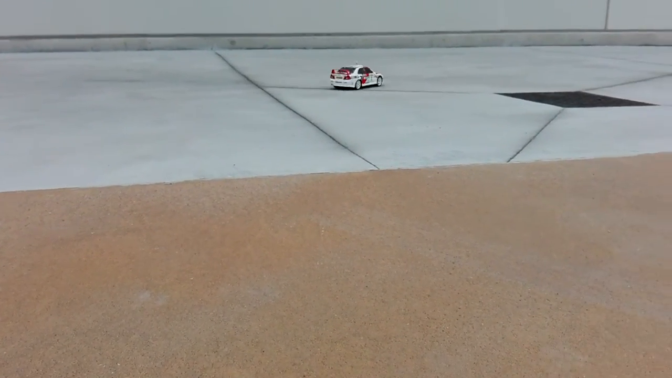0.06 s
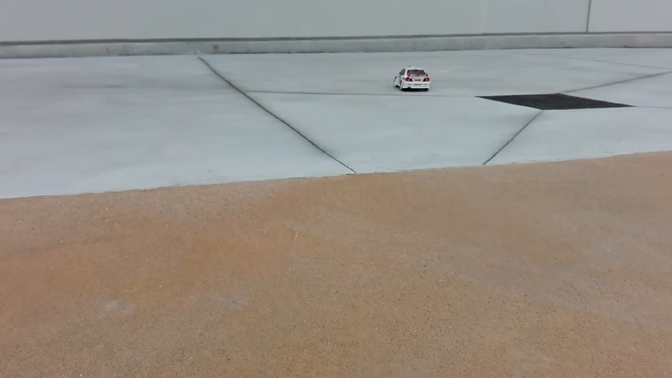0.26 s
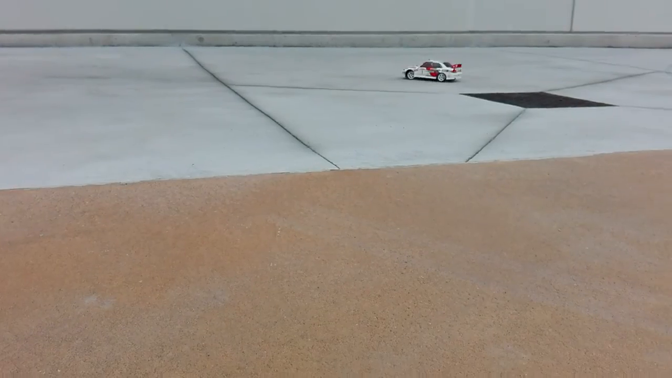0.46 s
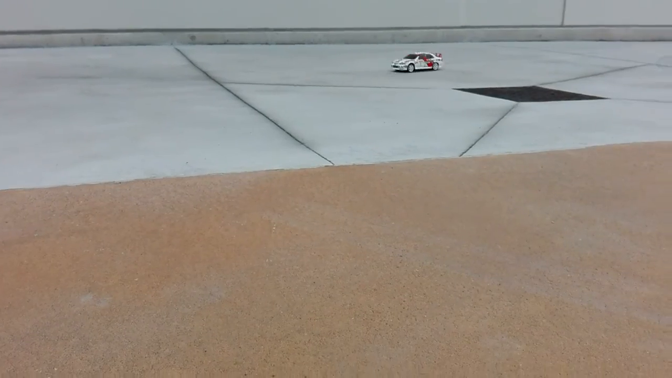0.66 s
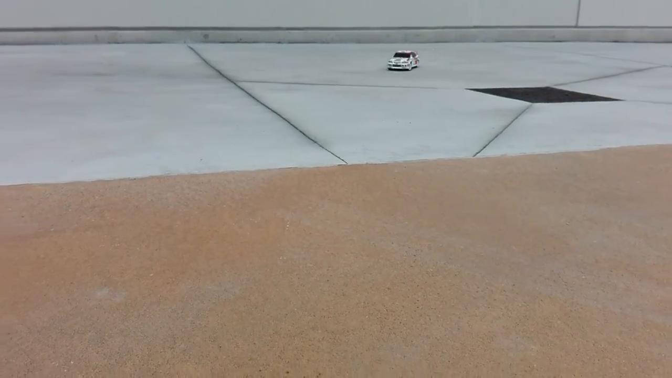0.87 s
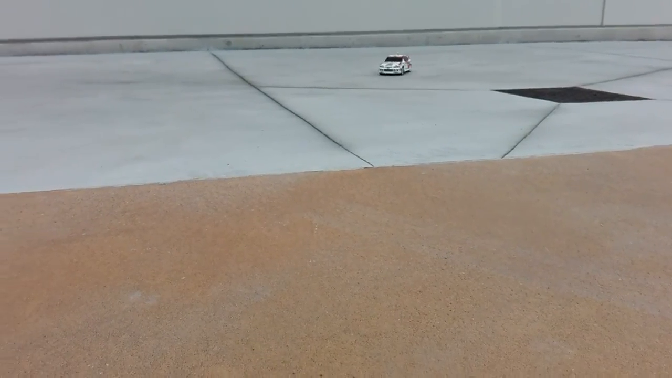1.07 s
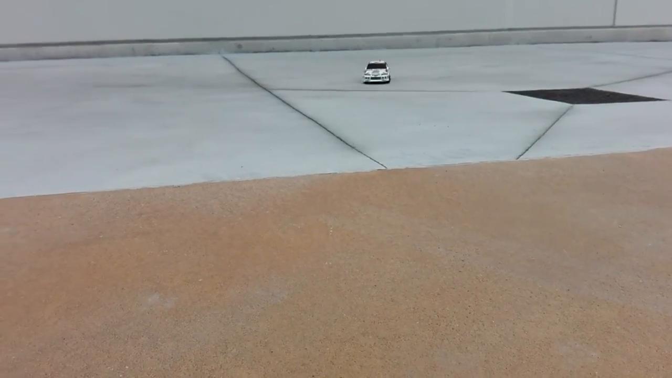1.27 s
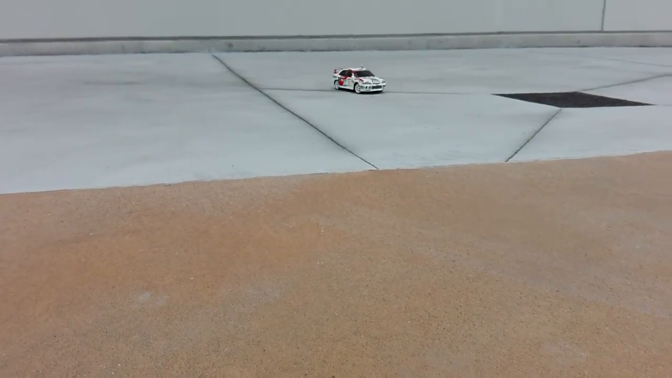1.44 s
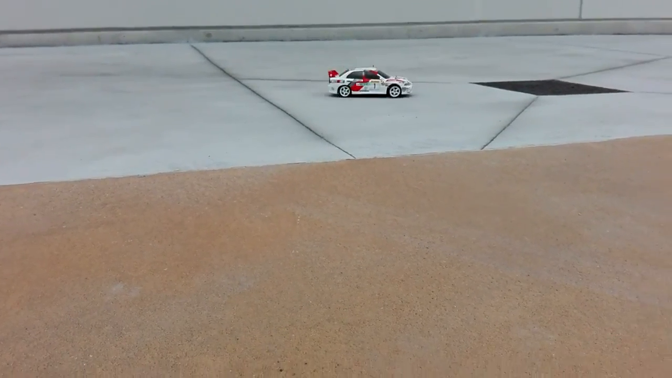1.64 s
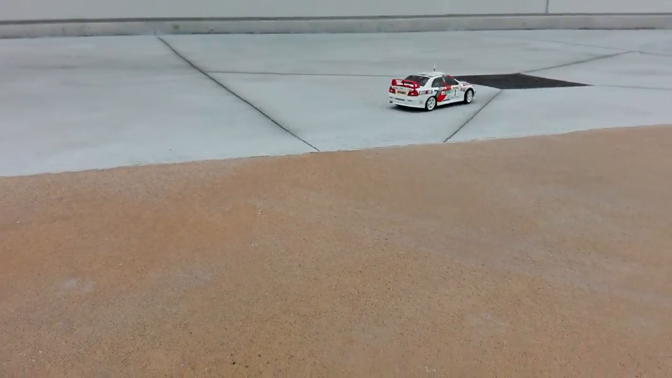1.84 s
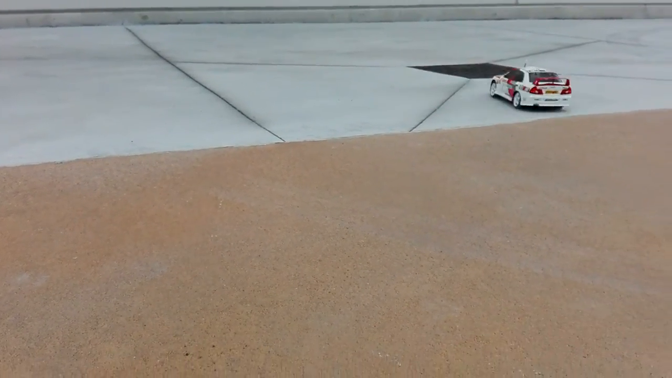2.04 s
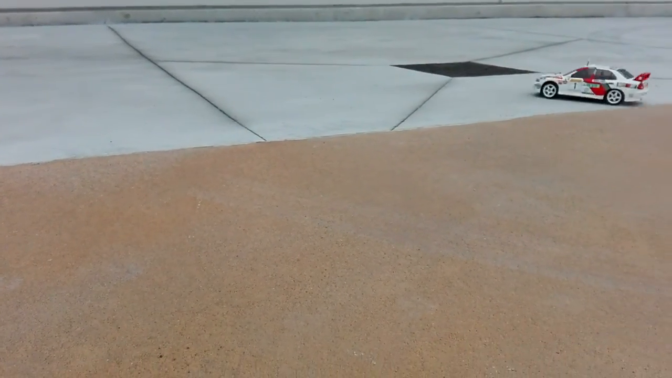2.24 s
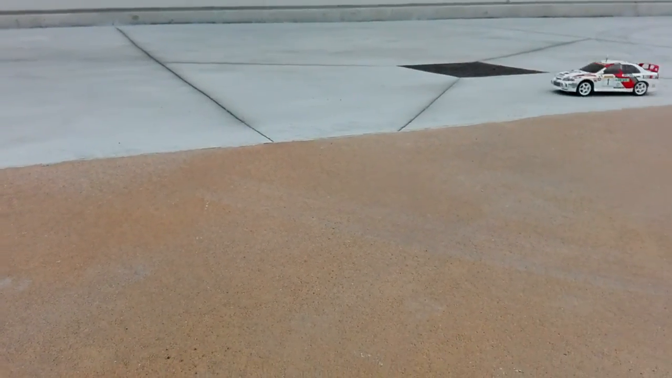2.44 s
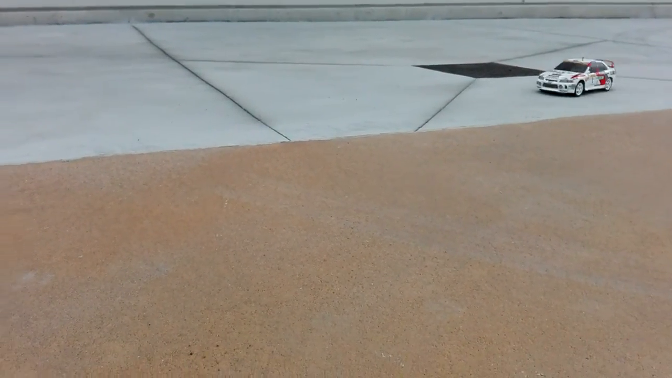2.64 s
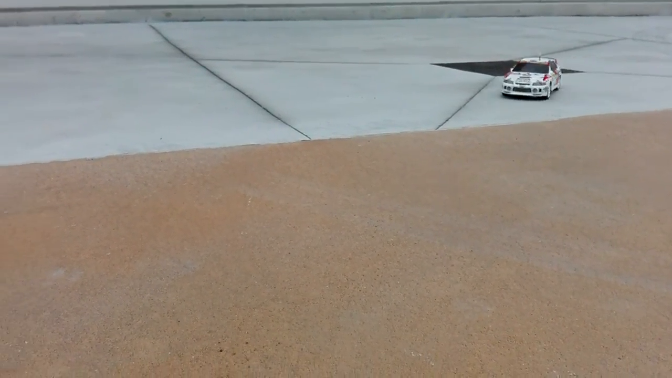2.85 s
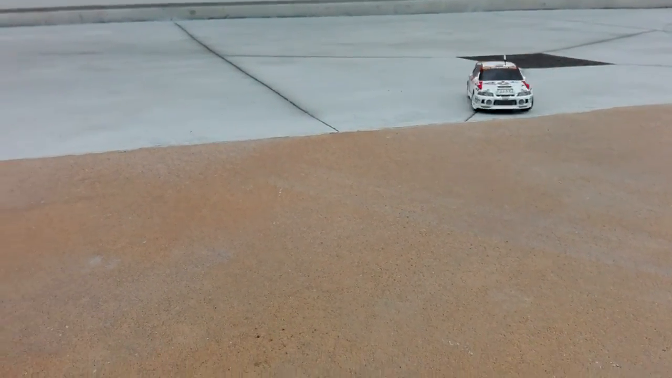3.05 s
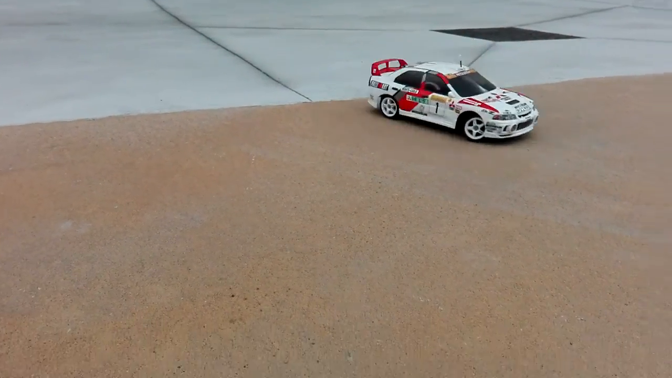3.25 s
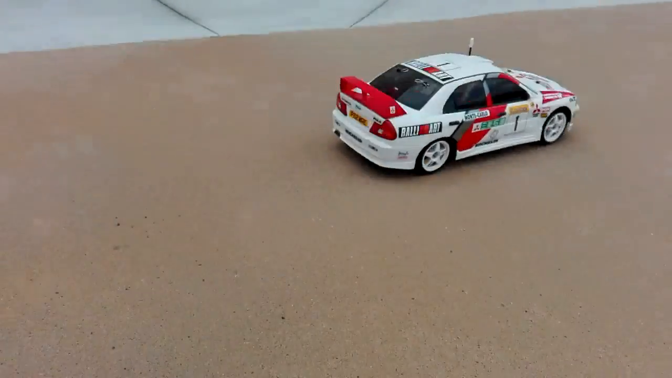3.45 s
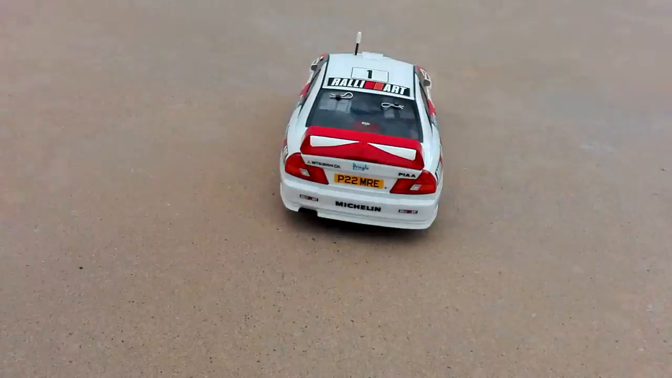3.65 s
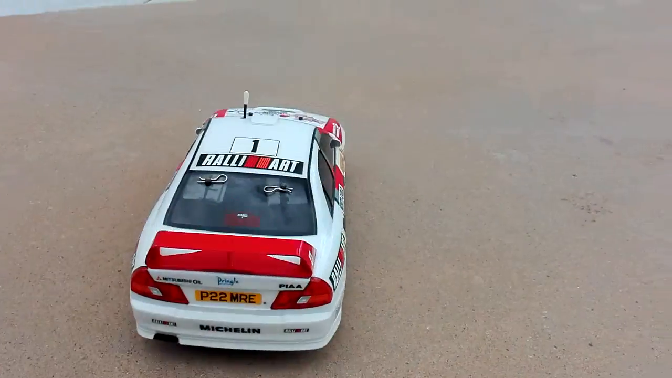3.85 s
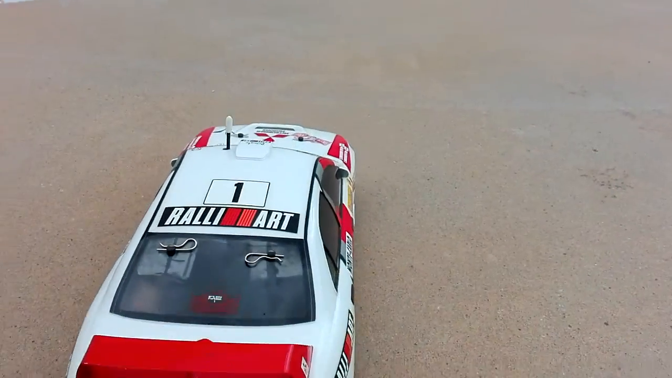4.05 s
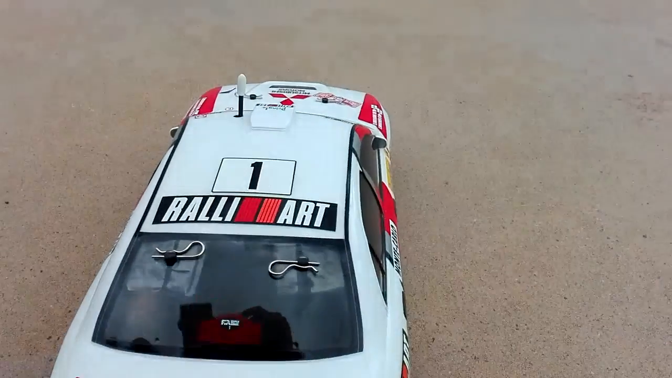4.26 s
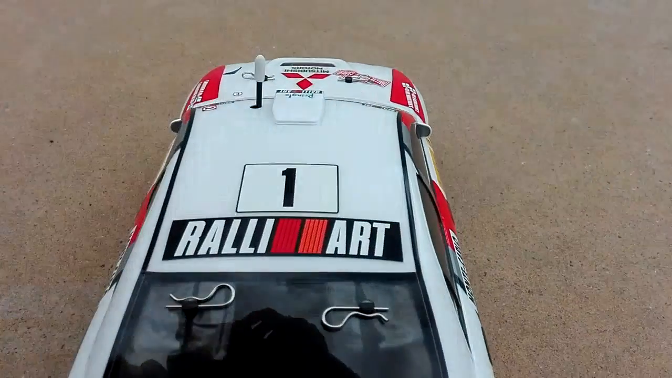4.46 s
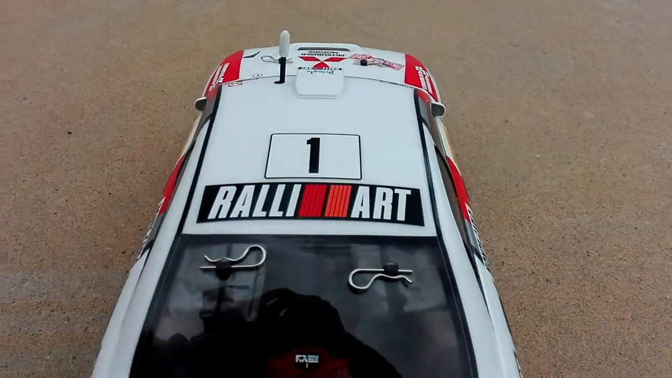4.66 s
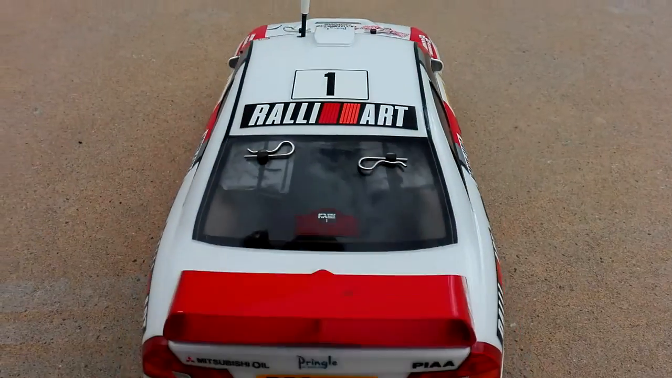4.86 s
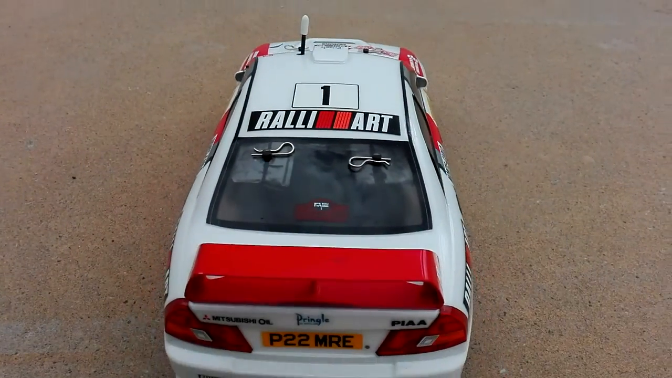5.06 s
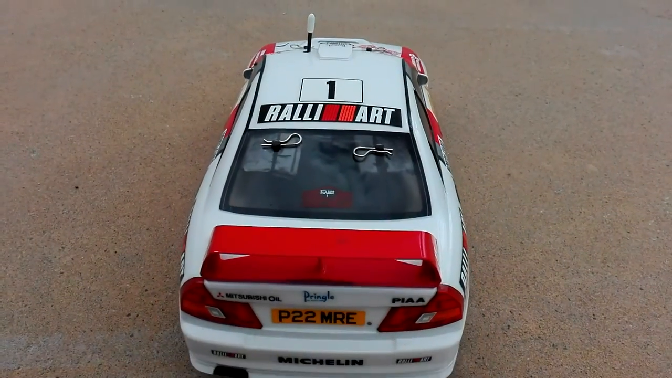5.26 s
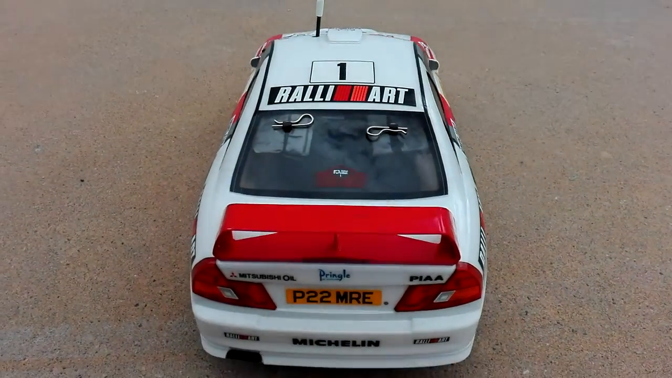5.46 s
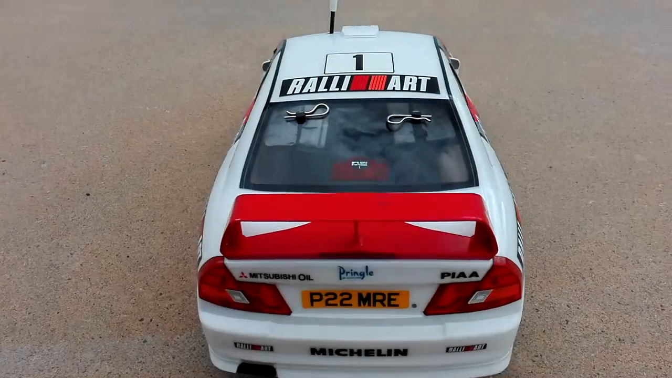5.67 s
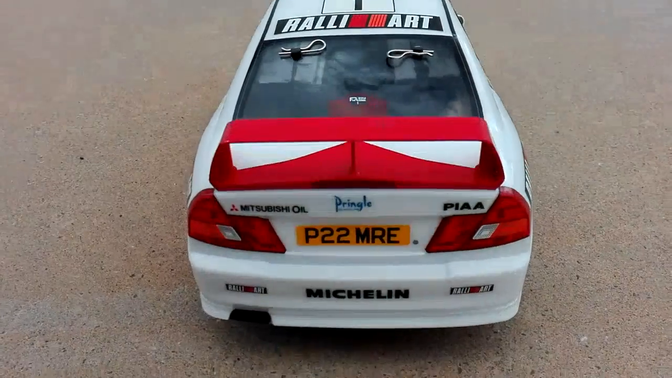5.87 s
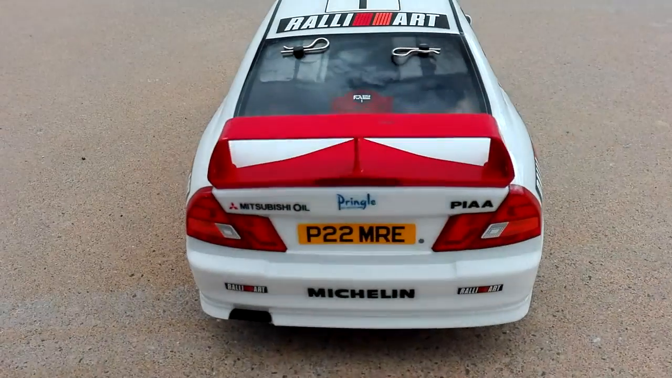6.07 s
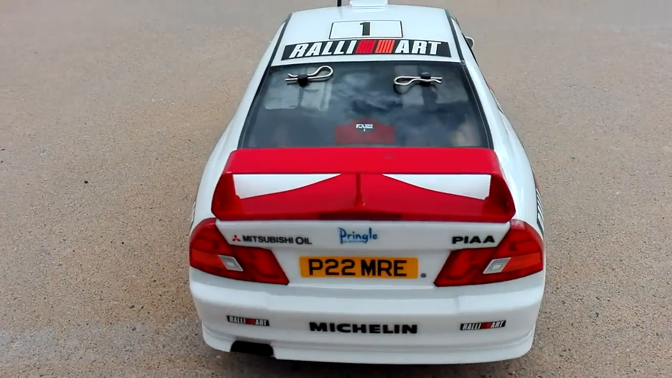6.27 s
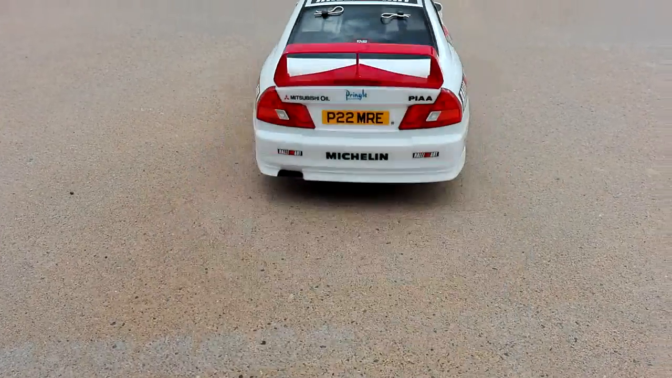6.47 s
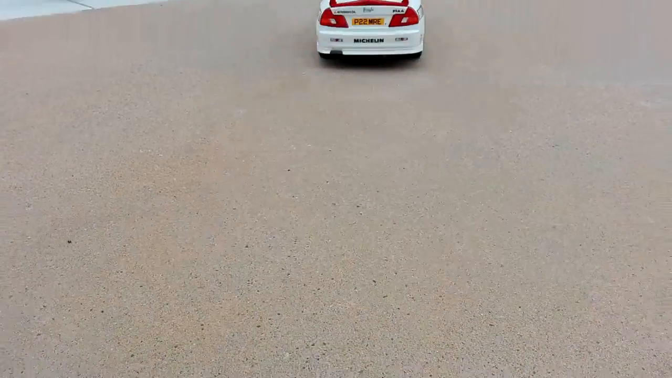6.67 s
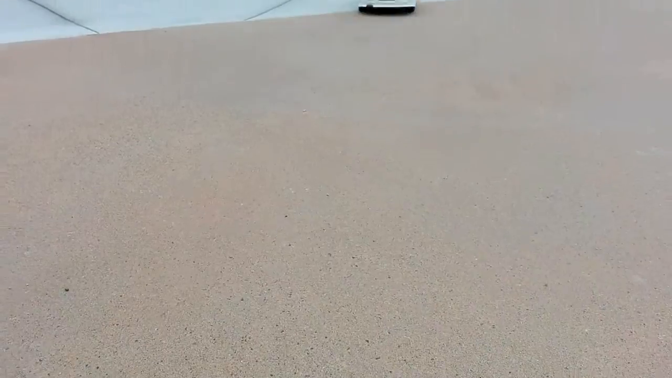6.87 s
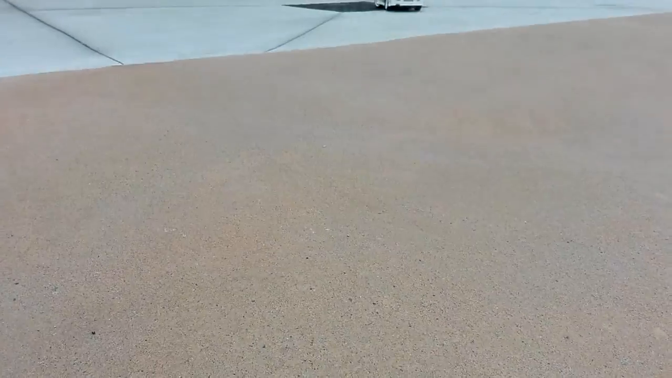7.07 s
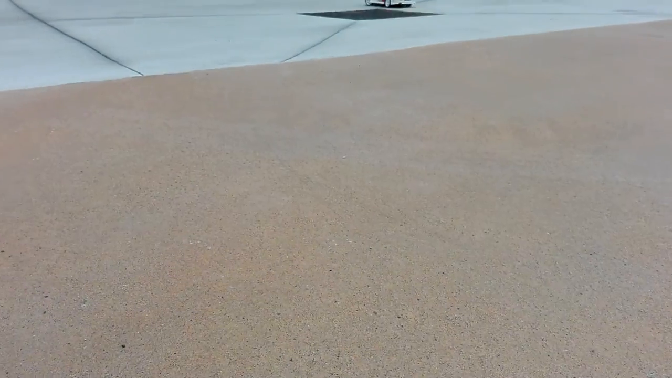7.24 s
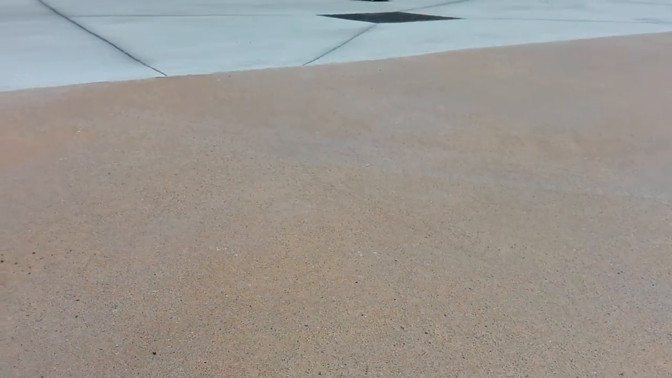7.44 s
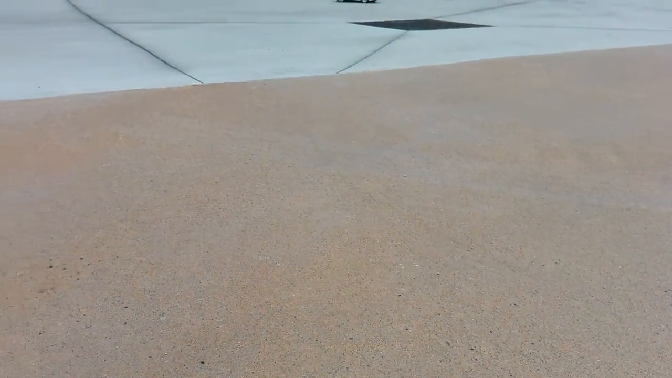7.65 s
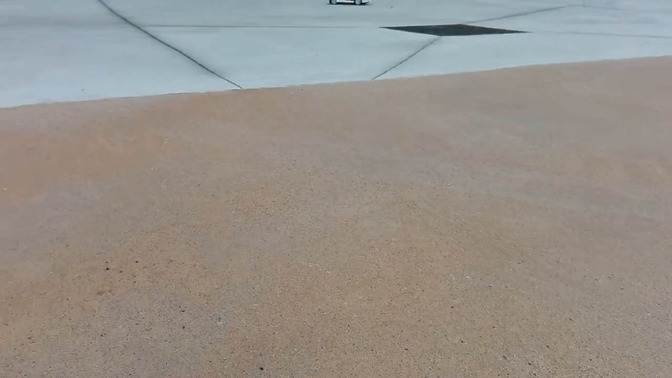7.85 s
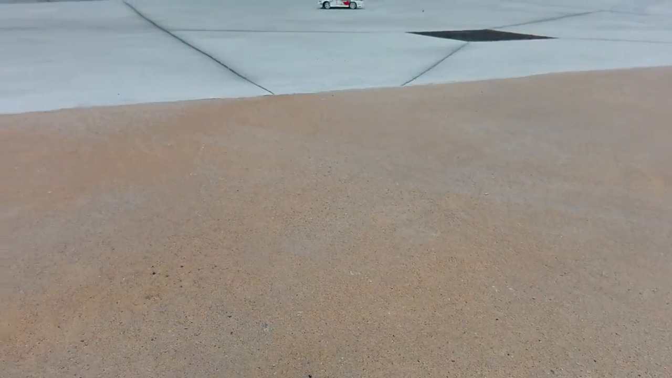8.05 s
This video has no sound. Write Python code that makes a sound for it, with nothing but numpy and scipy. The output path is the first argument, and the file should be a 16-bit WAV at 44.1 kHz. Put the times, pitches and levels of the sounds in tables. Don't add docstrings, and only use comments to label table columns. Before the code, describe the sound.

Motor hum, gear whir and tyre grit rise as a toy car nears and halts; small servo twitches follow, then it speeds off.

```python
import sys
import numpy as np
from scipy import signal
from scipy.fft import rfft, irfft, next_fast_len
from scipy.io import wavfile
from scipy.ndimage import uniform_filter1d

SR = 44100
rng = np.random.default_rng(int(sys.argv[2]) if len(sys.argv) > 2 else 0)


def volts(x):
    e = np.asarray(x, float) / 20
    return 10 ** e


def bounce(signal):
    frames = np.transpose(np.atleast_2d(signal))
    limited = np.clip(frames, -1, 1)
    pcm = np.round(limited * 32767).astype(np.int16)
    wavfile.write(sys.argv[1], SR, pcm)


N = 357651
T = np.arange(N) / SR

# f/Hz, density/dB
WIND_SPECTRUM = [(8.8, -46), (15, 12), (37, 1.5), (67, 3), (117, -5), (162, -18), (252, -24.5), (300, -34),
                 (390, -53), (660, -120)]
# peak t/s, level/dB, hold/s
GUSTS = [(0.08, -43, 0.018), (0.276, -48.5, 0.23), (1.618, -36.5, 0.029), (1.85, -53, 0.37),
         (2.514, -45.5, 0.015), (3.59, -49, 0.31), (4.35, -50.5, 0.019), (4.724, -45, 0.03),
         (5.12, -49.5, 0.046), (6.856, -43.5, .17), (7.26, -37.5, .02), (7.438, -41.5, 0.16),
         (7.782, -37, 0.017), (7.92, -34.5, 0.25)]
BREEZE_DB, GUST_RISE_DB_S, GUST_FALL_DB_S, LUMPS_DB = -56, 142, 248, 3
# f/Hz, density/dB
YARD_SPECTRUM = [(88, -24), (150, 8.5), (246, 1.5), (603, -12), (1090, 0.5), (1630, -7), (2520, -36),
                 (6930, -20), (7620, -17), (8070, -28), (8550, -22.5), (14300, -27)]
YARD_DB = -65
# t/s, level/dB
SCUFF = [
    (3.7, -53.5),
    (4.44, -55),
    (4.57, -55.5),
    (5.29, -61),
    (6.16, -66),
    (6.4, -60),
]
# f/Hz, density/dB
SCUFF_SPECTRUM = [(180, -39), (300, -26), (414, 2.5), (456, -11.5), (762, -7), (1730, -0.5), (2280, -8),
                  (3690, -12.5), (14000, -38)]
# t/s, peak level/dB, f/Hz, t60/s
THUMPS = [
    (0.308, -28, 226, 0.062),
    (1.151, -27, 234, 0.054),
    (2.994, -26.5, 234, 0.052),
    (3.423, -41.5, 256.5, 0.42),
    (4.287, -40.5, 223, 0.1),
    (4.604, -38, 413, 0.27),
    (4.669, -26, 411, 0.11),
    (6.993, -22, 248, 0.041),
    (7.923, -30, 191, 0.098),
]
# t/s, peak level/dB, low ring re crack/dB, t60/s
KNOCKS = [(0.614, -25, -12, 0.041), (1.5657, -24.5, -15, 0.03), (3.7165, -43, 16.5, 0.044),
          (4.6184, -28, -10, 0.034), (4.5916, -47, 5, 0.03), (4.6508, -23, 7.5, 0.076),
          (4.668, -19.5, 12.5, 0.07), (4.6785, -37, -15, 0.03), (6.508, -25.5, -23, 0.014),
          (6.989, -23, 5.5, 0.016), (7.2207, -23, -11, 0.028), (7.2281, -8, -17, 0.025),
          (6.527, -30, -20, 0.013), (7.2547, -20.5, -15, 0.02), (7.2945, -31.5, 7, 0.05),
          (7.299, -25, 0, 0.05)]
# f/Hz, level/dB, t60/s
KNOCK_MODES = [(1515, 5.5, 0.026), (2000, -8, 0.019), (4420, -6, 0.03), (5270, 1, 0.027),
               (6820, -1.5, 0.019), (7950, 5, 0.01), (9500, -4, 0.013)]
# t/s, peak level/dB, centre f/Hz, brightness/dB
TICKS = [(3.7544, -56, 3320, -12), (3.8716, -46, 5700, -5), (3.8814, -53, 3380, -10),
         (3.9225, -49, 3290, -14), (3.954, -38, 4800, -15), (3.965, -45, 5400, -12),
         (4.0587, -46, 4460, -12), (4.148, -50, 3630, -17), (4.17, -44.5, 5100, -5),
         (4.2083, -62, 3330, -2), (4.242, -52, 5260, 1), (4.5734, -52, 4000, -14), (4.8452, -43, 1900, -40),
         (4.897, -52, 5000, -14), (4.964, -44.5, 2930, -16), (5.035, -45.5, 3650, -15),
         (5.113, -45, 5200, -15), (5.1458, -43, 3460, -18), (5.2101, -49, 4060, -15),
         (5.3158, -54, 3370, -10), (5.43, -51, 3350, -12), (5.4443, -45.5, 3330, -5),
         (5.469, -50, 3350, -10), (5.884, -46, 6000, -11), (5.9157, -45, 6000, -12), (6.134, -49, 5630, -5),
         (6.236, -55, 5290, -34), (6.293, -55, 5000, -14), (6.157, -61, 5500, -20),
         (6.3346, -51, 2700, -20), (6.363, -49, 2500, -20), (6.374, -57, 5200, -14),
         (6.387, -41, 2500, -16), (6.414, -36, 2600, -16), (6.445, -44, 4500, -16), (6.574, -40, 5500, -16),
         (6.598, -37, 5200, -16), (6.622, -38, 5000, -16)]
# peak t/s, hold/s, level/dB, rise/(dB/s), fall/(dB/s)
NUDGES = [
    (3.745, .01, -80, 900, 24),
    (4.397, .02, -67, 400, 170),
    (4.536, 0.024, -54, 300, 300),
    (4.634, 0.15, -58, 300, 1107),
    (5.524, 0.021, -66.5, 125, 125),
    (5.635, .01, -59.5, 220, 180),
    (5.79, .03, -57.5, 101.5, 70),
    (6.1, 0.1, -98, 100, 298),
    (6.4, 0.093, -56, 107, 20),
]
WHINE_HZ = 7800
SPLIT_FROM_S, SPLIT_OVER_S = 6.25, 0.093
# peak t/s, level/dB, f/Hz, glide/(Hz/s), half length/s
CHIRPS = [
    (3.769, -63, 1415, -2500, 0.089),
    (4.051, -69, 4520, -800, 0.088),
    (4.228, -62, 1935, -800, .13),
    (5.048, -60.5, 3730, -600, .07),
    (5.599, -75.5, 3790, 202, 0.052),
    (5.97, -75, 3810, 400, 0.059),
    (5.467, -73, 3600, -2, 0.04),
]
CHIRP_EDGE_DB = 17
# start t/s, hold/s, rasp level/dB, tooth rate f/Hz, body jolt re rasp/dB
STROKES = [
    (4.406, 0.099, -38.5, 2723, -43),
    (4.626, 0.0099, -49, 2514, 1.5),
    (4.652, 0.024, -33, 2690, -5.5),
    (4.713, 0.011, -38.5, 2720, -33),
]
STROKE_RISE_DB_S, STROKE_FALL_DB_S, SAG_HZ_PER_S, LOW_DB = 590.5, 656, -3000, 1
# start t/s, hold/s, level/dB, low part re level/dB
SETTLE = [
    (4.384, 0.037, -48.5, -15),
    (4.482, 0.028, -53, -8),
    (4.68, 0.043, -50.5, 5),
    (4.813, 0.037, -52.5, -24),
    (4.904, 0.03, -59, -17),
    (3.73, 0.041, -68, -18),
]
SETTLE_RISE_DB_S, SETTLE_FALL_DB_S, CREAK_FLUTTER_DB = 500, 165, 2.6
# f/Hz, density/dB
RASP_SPECTRUM = [(88, -52), (150, -27), (412, -29), (462, -32.5), (1180, -37), (1510, -21), (1930, -28.5),
                 (2720, -8), (4060, -16), (5210, -7.5), (14300, -24.5)]
# f/Hz, width/Hz, level/dB
RASP_MODES = [(1470, 72, 1), (1780, 120, 10), (5100, 290, -1), (6700, 370, 3.5), (9600, 670, -2)]
# f/Hz, density/dB
SHELL_SPECTRUM = [(88, -46), (150, -11), (189, -22.5), (251, -15.5), (361, -15), (489, -14.5), (615, -14),
                  (884, -11.5), (1070, -7.5), (2750, -7.5), (3420, -3), (5950, -8), (7920, -3), (9580, -10),
                  (14300, -18)]
# f/Hz, width/Hz, level/dB
SHELL_MODES = [(889, 142, 11.5), (1089, 120, 3), (1488, 50, -1), (1650, 32, -6), (3600, 1300, -3.5),
               (5150, 350, -4.5), (6500, 130, -18)]
# t/s, level/dB, heading (open underside toward the listener)/dB
PASS = [
    [(0, -36, -6), (.3, -41, 0.5), (.9, -43, -2), (1.25, -47, 0), (1.5, -42.5, -2.5), (1.63, -37, -1),
     (1.97, -35.5, 1), (2.3, -37, 0), (2.9, -39.5, 1), (3.18, -36, 0), (3.36, -29, -1.5), (3.52, -35, -2),
     (3.64, -47.5, 8), (3.72, -50.5, 2.5), (3.76, -77, -37)],
    [(6.32, -86, -8), (6.464, -40, -15.5), (6.69, -35, -1), (6.94, -34, 2), (7.19, -40.5, -3.5),
     (7.25, -38.5, -2), (7.36, -43.5, -3.5), (7.68, -50.5, 0.5), (8.11, -58, -16)],
]
ROUGH_FROM_S, ROUGH_OVER_S, ROUGH_DB = 2.56, 0.98, 10.5
HISS_DB, FIZZ_DB, RUMBLE_DB, HISS_TURN, FIZZ_TURN = -4.5, -8.5, -28, 0.15, 1.33
HISS_FAR_DB_PER_DB = 0.23
SCRAPE_DB, SCRAPE_ROUGH, STREAK_DB = -27, 0.82, 2.4
# t/s, hum f/Hz, load/dB, tooth bite/dB
SPEED = [
    [(0, 451, -19, 5), (.16, 492.5, 7, 3.5), (.43, 477, 0, -4), (.485, 406, 3, 8), (.9, 390.4, 0, 7),
     (1.0, 431, 2, 0.5), (1.38, 417, 1, 6), (1.63, 535, 4.5, 1), (1.75, 494, 0, 4.5), (1.88, 502.5, 3.5, 3),
     (2.02, 428, 1, -11), (2.2, 471, 3.5, 5), (2.75, 443, -3, 0.5), (3.05, 503, 3, -1),
     (3.37, 541.4, -4.5, -3), (3.5, 520, -12, -5), (3.75, 296, -7, -26)],
    [(6.4, 108, 2, -4), (6.56, 164, 2.5, 1), (6.63, 197, 3, 5.5), (6.69, 244, -3, 4.5), (6.76, 328, 0, 5.5),
     (6.82, 408, 2, 11.5), (6.865, 472, 2, 7), (6.93, 490, 1, 3.5), (6.99, 587, 2, 6.5),
     (7.035, 812, 9.5, 1), (7.055, 777, 5, -7), (7.11, 500, -2, -17), (7.17, 416.5, -6.5, -1),
     (8.11, 407, -10, 3)],
]
MESH_RATIO = 8.605
HUM_DB, SECOND_DB, FOURTH_DB, MESH_DB, DOUBLE_DB, HUM_ROUGH = -7, 3.5, -12.5, -8, -12, 0.42
CHATTER_DB, DRIFT_DB = 3.6, 1
TOOTH_SHIVER, STRAIN_S = .011, .4
# f/Hz, level/dB
GEARBOX = [(1600, -5), (2500, -0.5), (3450, 0), (4500, -5.5), (5800, 2), (8200, 11), (10200, -28)]
# f/Hz, level/dB
GEARBOX_DOUBLE = [(2400, -10), (3450, 10), (4300, -10), (6200, -10), (7300, 1), (8300, 1), (10200, -28)]
# f/Hz, level/dB
FLAT = [(1, 0), (2, 0)]
# f/Hz, side re mid where the channels differ/dB
SIDE_LEVEL = [(500, -33), (4000, -16), (14000, 3.5)]
# f/Hz, share of moments when the channels differ [0..1]
SIDE_SHARE = [(150, 0), (350, .5), (550, .2), (800, 0), (4000, 0), (4800, .25), (5800, .5), (8000, .55),
              (9500, .7), (14000, .65)]


def evened(x):
    return x / np.sqrt(np.mean(x ** 2) + 1e-20)


def read(points, hz):
    f, value = np.transpose(points)
    return np.interp(np.log(hz + 1), np.log(f + 1), value)


def columns(rows):
    s, *values = np.transpose(rows)
    since_start = T - s[0] + (s[0] < .01)
    until_end = s[-1] - T + (s[-1] > 8)
    gate = np.clip(np.minimum(since_start, until_end) / .02, 0, 1)
    return gate, *(np.interp(T, s, v) for v in values)


def drives(tables):
    curves = [np.array(columns(table)) for table in tables]
    return sum(c * (c[0] > 0) for c in curves)


def swell(s, hold, db, rise, fall):
    level = db - rise * np.maximum(s - T, 0) - fall * np.maximum(T - s - hold, 0)
    return volts(np.maximum(level, -140))


def rough_ground():
    return ROUGH_DB * np.clip((T - ROUGH_FROM_S) / ROUGH_OVER_S, 0, 1)


def colour(x, points, low_hz=0, high_hz=SR):
    size = next_fast_len(len(x))
    hz = np.fft.rfftfreq(size, 1 / SR) + 1e-3
    edges = 1 / np.sqrt((1 + (low_hz / hz) ** 16) * (1 + (hz / high_hz) ** 16))
    return evened(irfft(rfft(x, size) * volts(read(points, hz)) * edges, size)[:len(x)])


def ringing(x, modes, ring_db):
    size = next_fast_len(len(x))
    hz = np.fft.rfftfreq(size, 1 / SR)
    peaks = sum(volts(db + ring_db) / (1 + (2 * (hz - f) / width) ** 2) for f, width, db in modes)
    return irfft(rfft(x, size) * (1 + peaks), size)[:len(x)]


def resonate(x, hz, width):
    turn = np.exp(2j * np.pi * np.cumsum(hz * np.ones(len(x))) / SR)
    r = np.exp(-np.pi * width / SR)
    return 2 * (turn * signal.lfilter([(1 - r) ** 2], [1, -2 * r, r * r], x / turn)).real


def wander(size):
    return evened(uniform_filter1d(uniform_filter1d(rng.standard_normal(N), size), size))


def rough_line(hz, blur_hz, flutter_db, size):
    turns = np.cumsum(np.minimum(hz, 15000) + blur_hz * wander(size)) / SR
    return np.sqrt(2) * np.sin(2 * np.pi * turns) * volts(flutter_db * wander(4 * size))


def fuzzy_line(hz, width):
    return evened(resonate(rng.standard_normal(N), np.minimum(hz, 15000), width))


def grit(patchy_db, flicker_db, per_s, spread_db, grain_db, streak_db=0):
    a, b, patches, streaks = rng.standard_normal((N // 256 + 5, 513, 4)).T
    patches = evened(uniform_filter1d(uniform_filter1d(patches, size=10, axis=0), size=8, axis=1))
    streaks = evened(uniform_filter1d(uniform_filter1d(streaks, size=2, axis=0), size=60, axis=1))
    field = (a + 1j * b) * volts(patchy_db * patches + streak_db * streaks)
    wash = evened(signal.istft(field, nperseg=1024, noverlap=768)[1][:N])
    stones = volts(spread_db * np.minimum(rng.exponential(1, N), 5)) * (rng.random(N) < per_s / SR)
    stones = signal.lfilter([1], [1, -.97], stones) * rng.standard_normal(N)
    return evened(wash * volts(flicker_db * wander(500)) + volts(grain_db) * evened(stones))


def add(mix, s, sound):
    part = mix[round(s * SR):][:len(sound)]
    part += sound[:len(part)]


def air():
    gusts = sum(swell(s, hold, db, GUST_RISE_DB_S, GUST_FALL_DB_S) for s, db, hold in GUSTS)
    wind = colour(rng.standard_normal(N), WIND_SPECTRUM, 0, 260)
    wind = wind * (volts(BREEZE_DB) + gusts) * volts(LUMPS_DB * wander(1500))
    gate, db = columns(SCUFF)
    scuff = gate * volts(db - 4.5) * colour(grit(1.5, 1.0, 300, 3.0, -12), SCUFF_SPECTRUM)
    yard = volts(YARD_DB - 2) * colour(rng.standard_normal(N), YARD_SPECTRUM)
    return wind + scuff + yard


def thumps():
    out, t = np.zeros(N), np.arange(6000) / SR
    for s, db, hz, t60 in THUMPS:
        ring = volts(-60 * t / t60) * np.sin(2 * np.pi * hz * t) * (1 - np.exp(-t / 0.0038))
        slap = evened(resonate(rng.standard_normal(len(t)), 600, 420)) * volts(-16 - 60 * t / 0.055)
        add(out, s, volts(db - 4) * (ring + slap))
    return out


def knocks():
    out, t = np.zeros(N), np.arange(6000) / SR
    for s, db, low_db, t60 in KNOCKS:
        noise = rng.standard_normal(len(t))
        crack = evened(resonate(noise, 2900, 7400)) * volts(-60 * t / t60)
        modes = 0
        for k, (f, mode_db, mode_t60) in enumerate(KNOCK_MODES):
            decay = volts(mode_db - 60 * t / mode_t60 + low_db * (f < 2500))
            detuned_hz = f * (1 + 0.036 * noise[k])
            modes = modes + decay * np.sin(2 * np.pi * detuned_hz * t + 9 * noise[-k])
        add(out, s, volts(db - 10) * (crack + volts(-1) * modes) * (1 - np.exp(-t / 0.00055)))
    return out


def ticks():
    out, t = np.zeros(N), np.arange(6000) / SR
    envelope = volts(-60 * t / 0.071) + 2.4 * np.exp(-t / 0.00064)
    for s, db, hz, bright_db in TICKS:
        noise = rng.standard_normal(len(t))
        burst = evened(resonate(noise, hz, 2900)) + volts(bright_db) * evened(np.diff(noise, prepend=0))
        add(out, s, volts(db - 14.5) * envelope * burst)
    return out


def whine():
    load = np.clip((T - SPLIT_FROM_S) / SPLIT_OVER_S, 0, 1)
    pure = rough_line(WHINE_HZ, 12, 1.5, size=150)
    smeared = fuzzy_line(WHINE_HZ, 220) * volts(2 * wander(200))
    switching = sum(swell(*row) for row in NUDGES) * ((1 - load) * pure + (.15 + load) * smeared)
    levels = np.array([swell(s, 0, db, CHIRP_EDGE_DB / half, CHIRP_EDGE_DB / half)
                       for s, db, _, _, half in CHIRPS])
    peak, _, hz, glide, _ = np.transpose(CHIRPS)[:, levels.argmax(axis=0)]
    hz = hz + glide * np.clip(T - peak, -.2, .2)
    return switching + levels.sum(axis=0) * rough_line(hz, 52, 1.9, size=100)


def twitch():
    scrub = ringing(colour(grit(2.5, 2.0, 3000, 2.5, -6), RASP_SPECTRUM), RASP_MODES, 0)
    levels = np.array([swell(s, hold, db, STROKE_RISE_DB_S, STROKE_FALL_DB_S)
                       for s, hold, db, _, _ in STROKES])
    start, _, _, hz, jolt_db = np.transpose(STROKES)[:, levels.argmax(axis=0)]
    hz = (hz + SAG_HZ_PER_S * np.clip(T - start, -.1, .2)) * (1 + 0.014 * wander(600))
    # order, level/dB, width/Hz
    orders = [(1, -8, 90), (1.25, -15, 200), (1.75, -12, 220), (2, -8, 260), (2.5, -11, 320), (2.85, -11, 260)]
    teeth = sum(volts(db) * fuzzy_line(k * hz, width) * volts(5.36 * wander(400)) for k, db, width in orders)
    rasp = levels.sum(axis=0)
    jolt = rasp * volts(jolt_db) * volts([[0], [LOW_DB]])
    creak = sum(swell(s, hold, db, SETTLE_RISE_DB_S, SETTLE_FALL_DB_S) * volts([[0], [low_db]])
                for s, hold, db, low_db in SETTLE)
    body, low = jolt + creak * volts(CREAK_FLUTTER_DB * wander(700))
    out = rasp * (colour(scrub, FLAT, 1700) + teeth)
    out = out + body * colour(scrub, FLAT, 1200, 1700) + low * colour(scrub, FLAT, 203, 1110)
    return volts(-4.5) * out


def rolling():
    tyre = grit(1.68, 0.82, 900, 3.8, -13, STREAK_DB)
    shell = ringing(colour(tyre, SHELL_SPECTRUM), SHELL_MODES, 0)
    gate, db, heading_db = drives(PASS)
    rough_db = rough_ground()
    hiss_db = HISS_DB + HISS_TURN * heading_db - HISS_FAR_DB_PER_DB * (db + 44)
    out = volts(-2.5) * colour(shell, FLAT, 1020, 2005)
    out += volts(hiss_db) * colour(shell, FLAT, 2590, 6540)
    out += volts(FIZZ_DB + FIZZ_TURN * heading_db) * colour(shell, FLAT, 4670)
    out += volts(RUMBLE_DB + rough_db) * colour(shell, FLAT, 204, 678)
    out += volts(SCRAPE_DB + SCRAPE_ROUGH * rough_db) * colour(shell, FLAT, 2240, 3300)
    return gate * volts(db) * out


def motor():
    gate, hz, load_db, bite_db = drives(SPEED)
    near, loud_db, heading_db = drives(PASS)
    hz = hz * (1 + 0.0021 * wander(900))
    chatter_db = CHATTER_DB * wander(300) + bite_db
    hum_db = load_db + HUM_DB + HUM_ROUGH * rough_ground()
    mesh_db = MESH_DB + chatter_db + read(GEARBOX, MESH_RATIO * hz)
    double_db = DOUBLE_DB + chatter_db + 1.04 * heading_db + read(GEARBOX_DOUBLE, 2 * MESH_RATIO * hz)
    # order, level/dB, width/Hz, share of shell colour (0: gear mesh)
    orders = [(1, hum_db, 28, 1.2), (2.036, load_db + SECOND_DB, 58, 1.4),
              (4, load_db + FOURTH_DB + 1.5, 36, .8),
              (MESH_RATIO, mesh_db, 240, 0), (2 * MESH_RATIO, double_db, 480, 0)]
    strain_per_s = abs(np.gradient(uniform_filter1d(np.log(hz + 1), size=2000))) * SR
    stumble = TOOTH_SHIVER * (1 + STRAIN_S * np.minimum(strain_per_s, 8)) * wander(250)
    out = 0
    for k, db, width, share in orders:
        level_db = db + share * read(SHELL_SPECTRUM, k * hz) + DRIFT_DB * wander(3000)
        out = out + volts(level_db) * fuzzy_line(k * hz * (1 + stumble * (share == 0)), width)
    return gate * near * volts(loud_db) * ringing(out, SHELL_MODES, -11.5)


def scene():
    car = thumps() + knocks() + ticks() + whine() + twitch() + rolling() + motor()
    t = np.arange(8000) / SR
    tail = rng.choice([-1., 1.], len(t)) * (rng.random(len(t)) < .05) * volts(-60 * t / 0.046)
    wet = signal.oaconvolve(car, tail / np.linalg.norm(tail))[:N]
    mid = air() + car + volts(-10) * wet
    return np.array([mid, mid])


def roll_off(x):
    return signal.sosfilt(signal.butter(12, 14750, fs=SR, output="sos"), x)


def record(dry):
    lowpass = signal.firwin(301, 14300, window=("kaiser", 9), fs=SR)
    mid = signal.oaconvolve(dry.mean(0), lowpass, "same")
    hz, t, z = signal.stft(mid, SR, nperseg=512, noverlap=384)
    scatter = np.exp(2j * np.pi * rng.random(z.shape[::-1]).T)
    band = (12 * np.log(hz + 300)).astype(int)
    block = ((t * SR + 341) // 1536).astype(int)
    draw = rng.random((block[-1] + 1, band[-1] + 1))
    draw = np.where(rng.random(draw.shape) < .6, draw[:, :1], draw)
    draw = draw[block][:, band].T
    apart = (draw < read(SIDE_SHARE, hz)[:, None]) * volts(read(SIDE_LEVEL, hz) + 2)[:, None]
    side = signal.istft(z * scatter * apart, SR, nperseg=512, noverlap=384)[1][:N]
    return roll_off(np.array([mid + side, mid - side]))


dry = scene()
out = record(dry)
bounce(out)
```